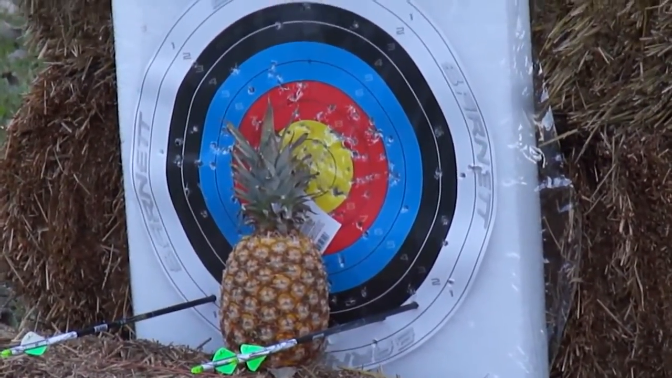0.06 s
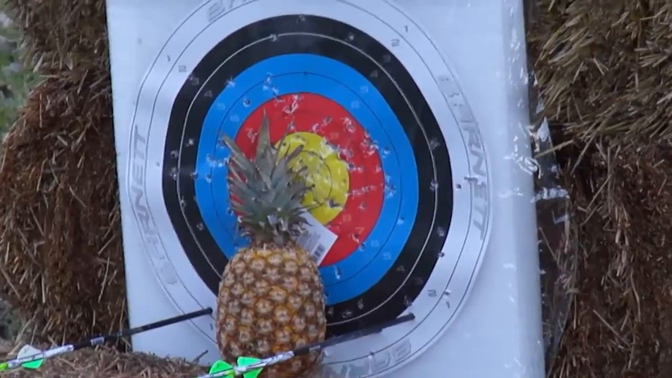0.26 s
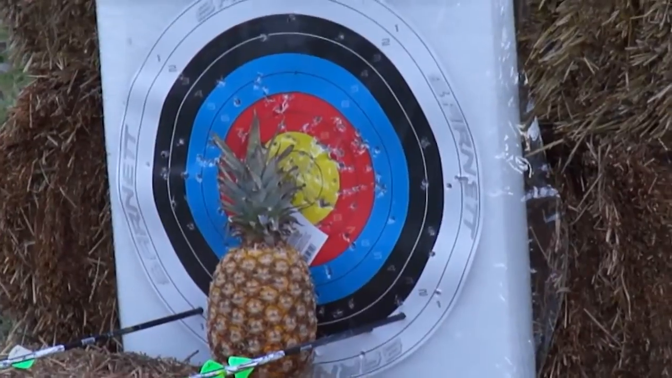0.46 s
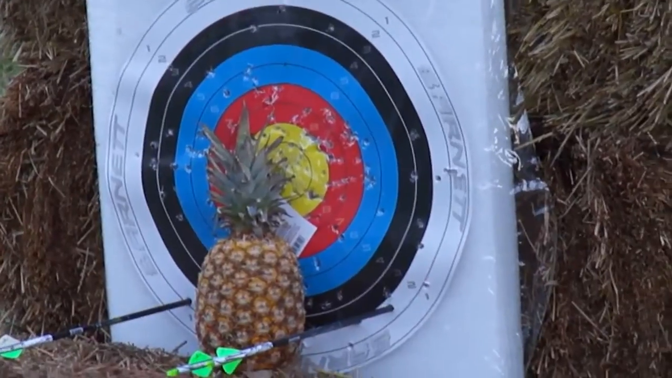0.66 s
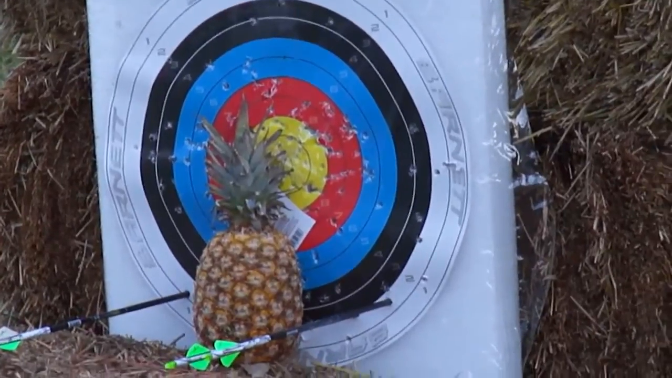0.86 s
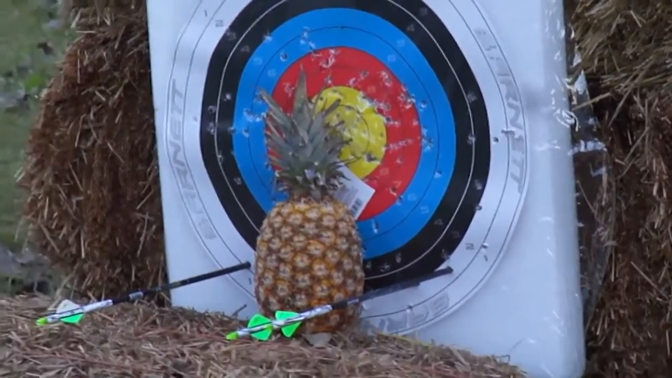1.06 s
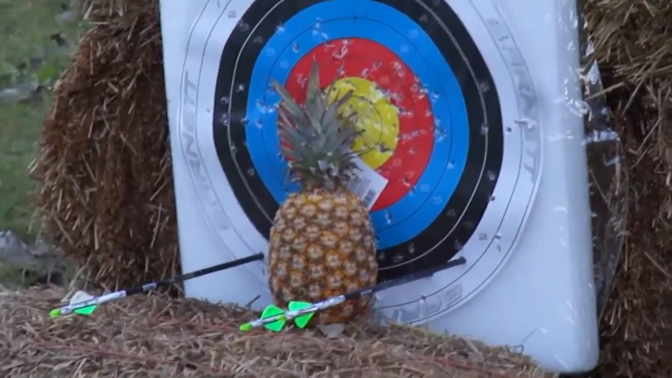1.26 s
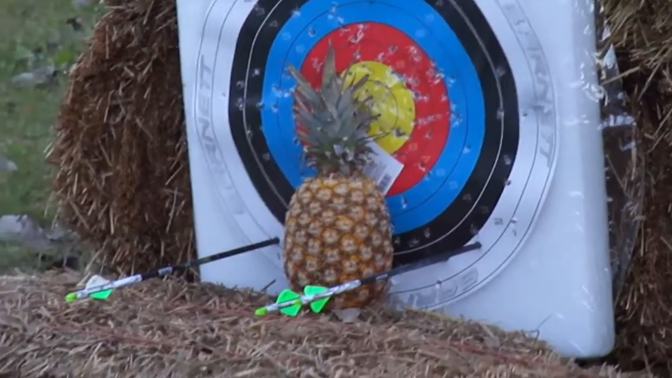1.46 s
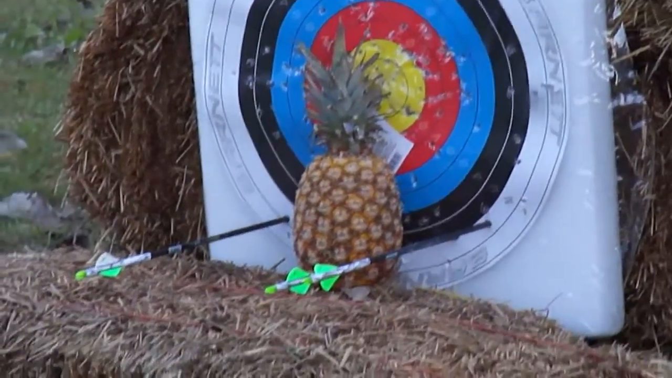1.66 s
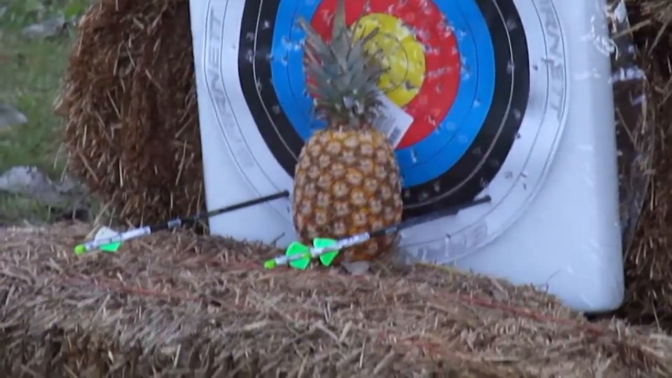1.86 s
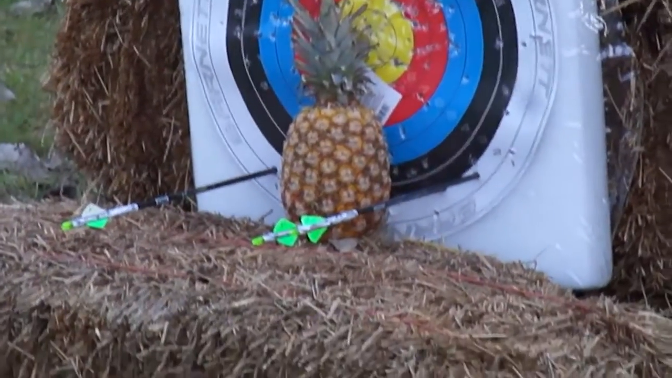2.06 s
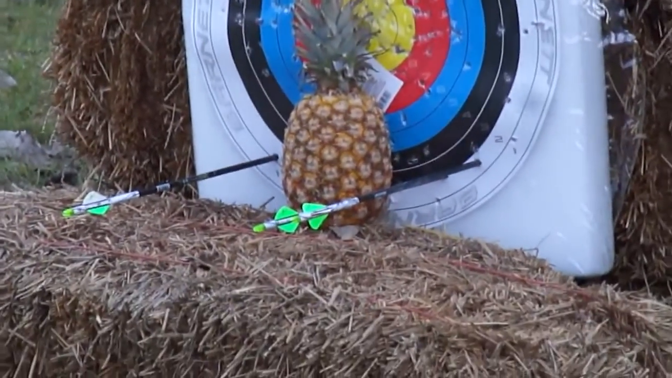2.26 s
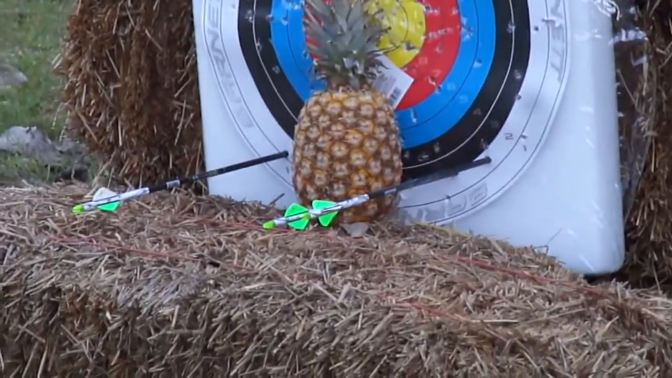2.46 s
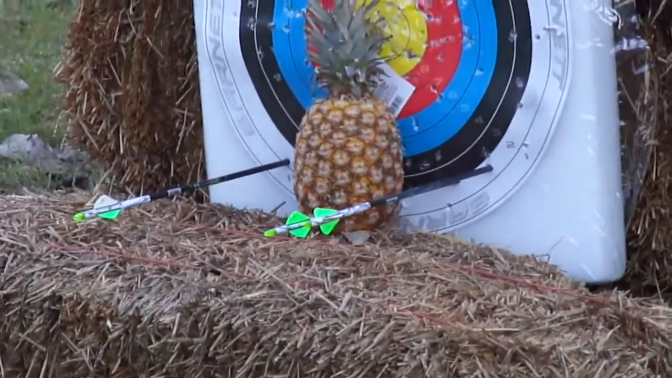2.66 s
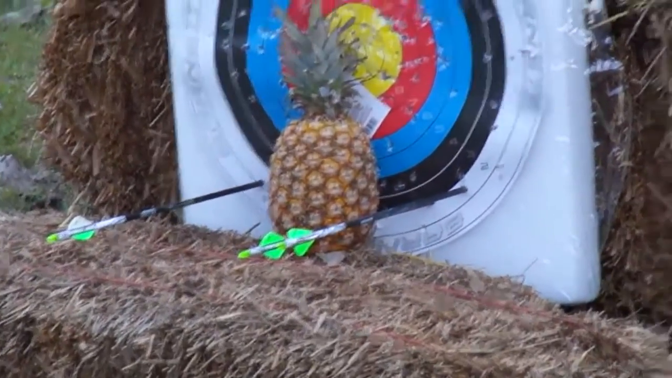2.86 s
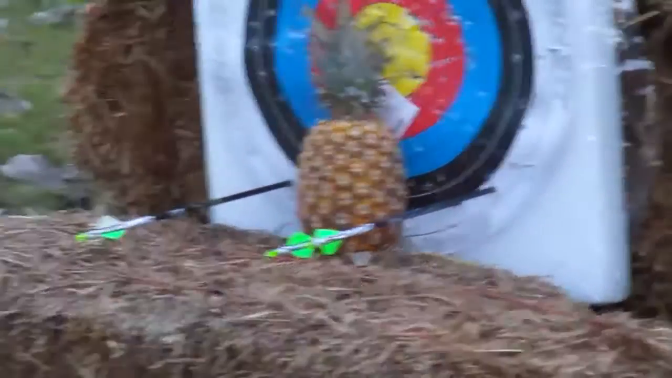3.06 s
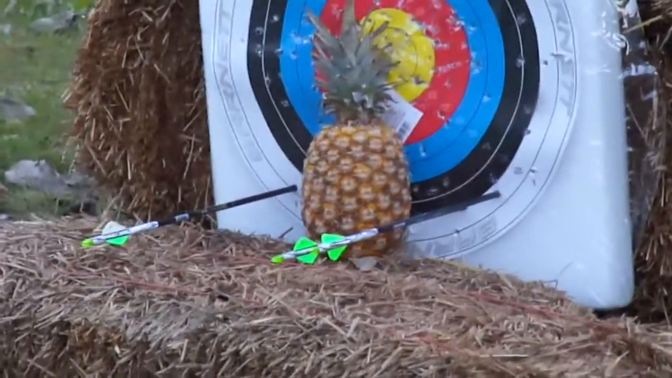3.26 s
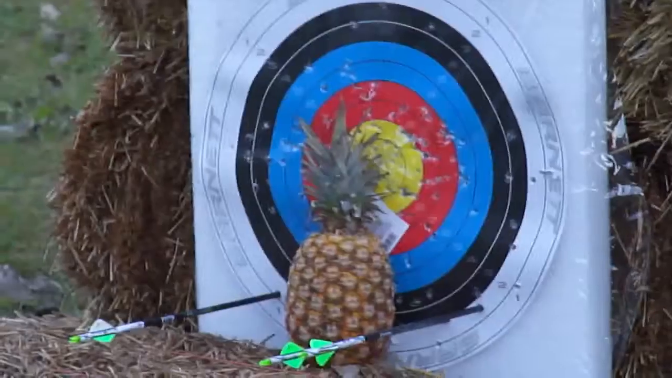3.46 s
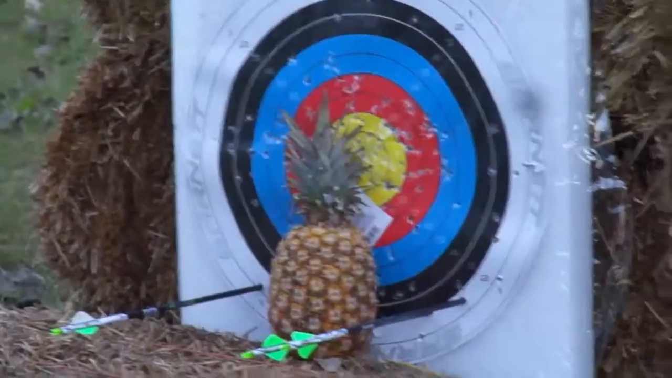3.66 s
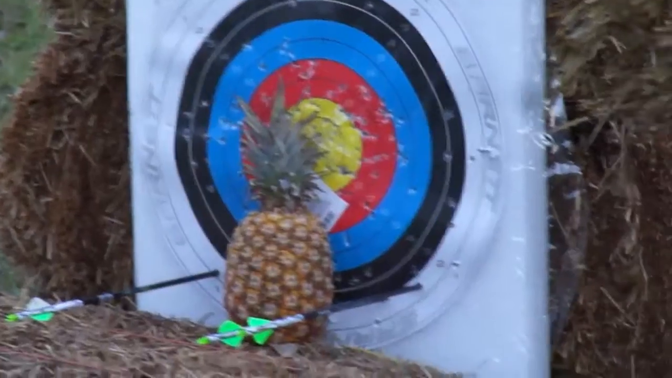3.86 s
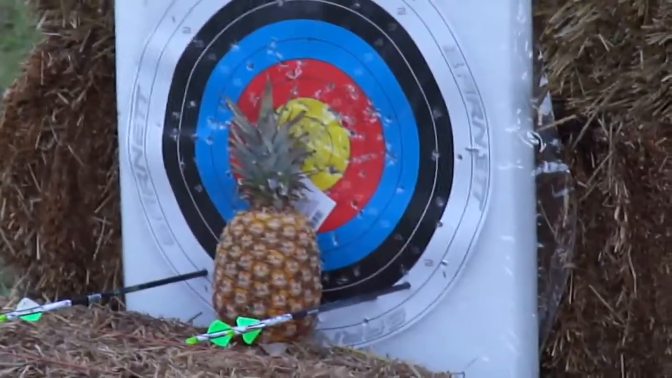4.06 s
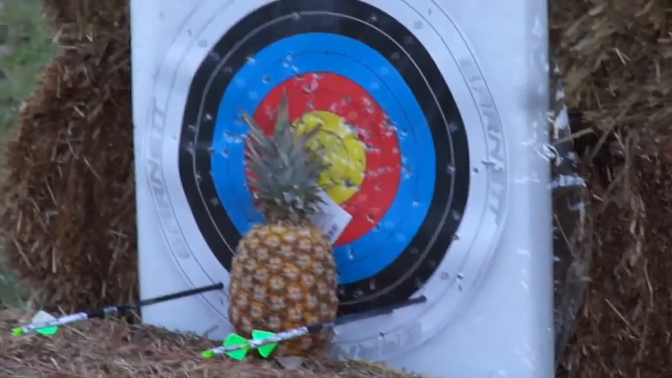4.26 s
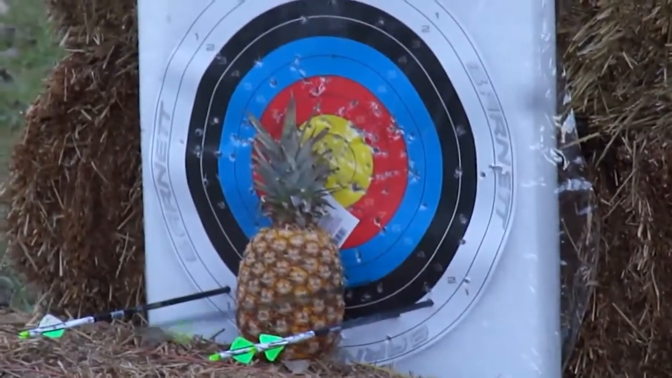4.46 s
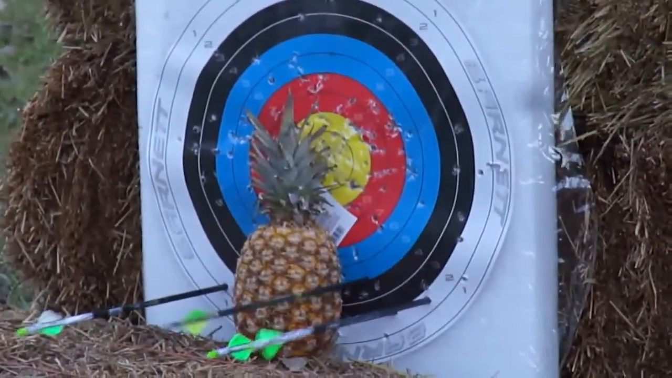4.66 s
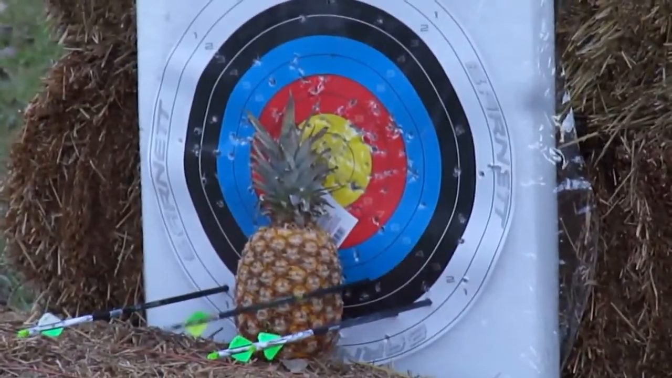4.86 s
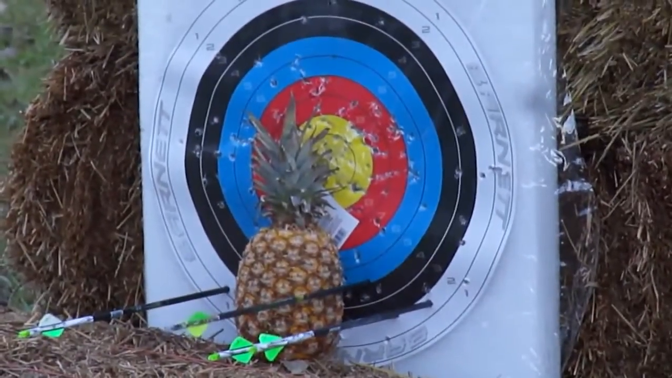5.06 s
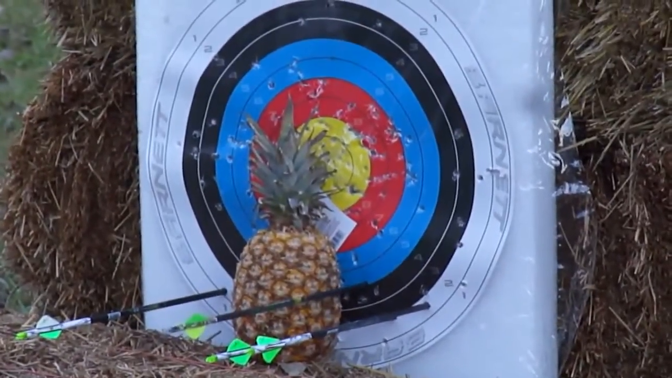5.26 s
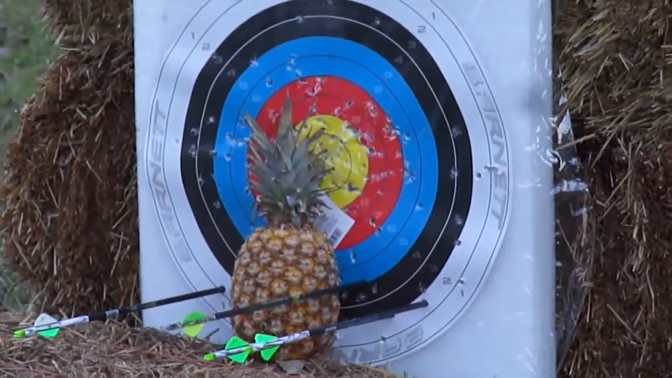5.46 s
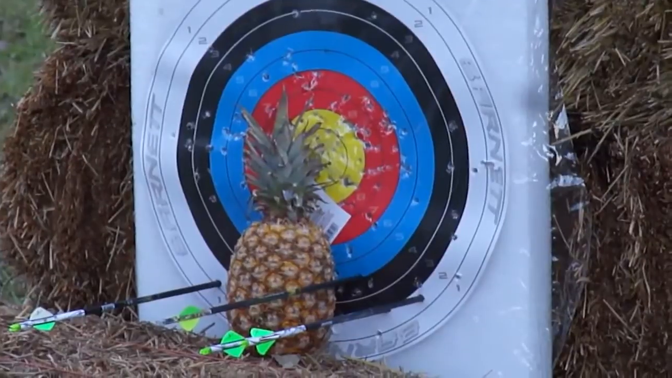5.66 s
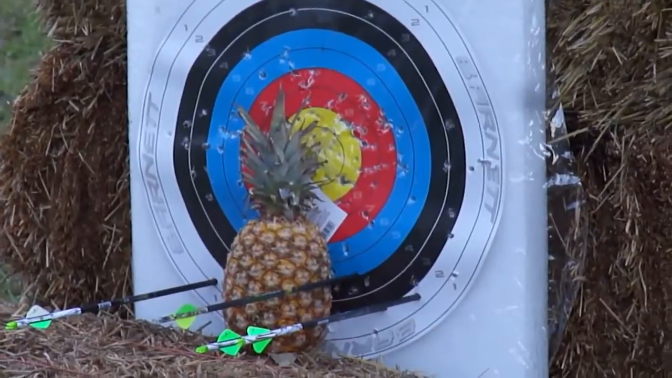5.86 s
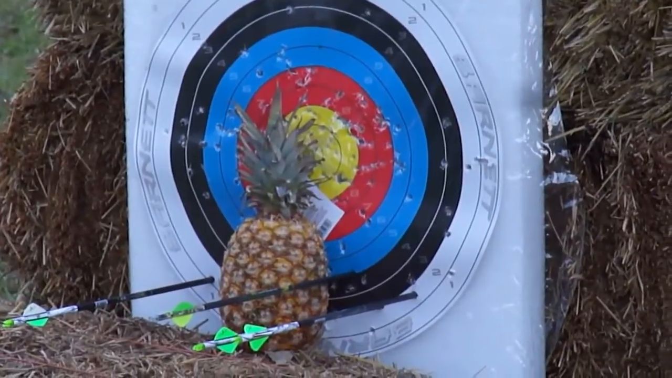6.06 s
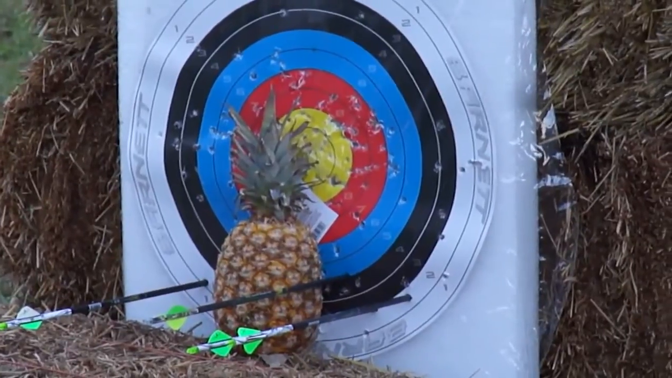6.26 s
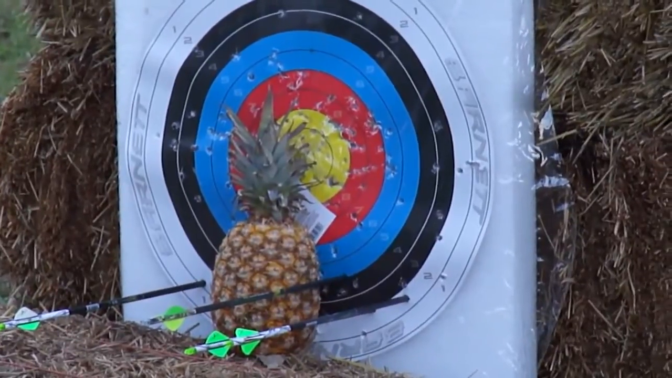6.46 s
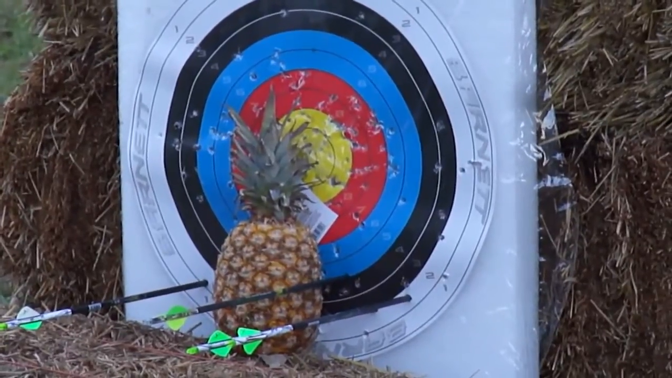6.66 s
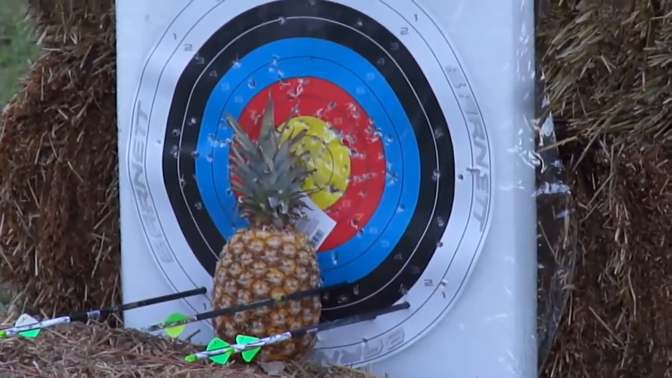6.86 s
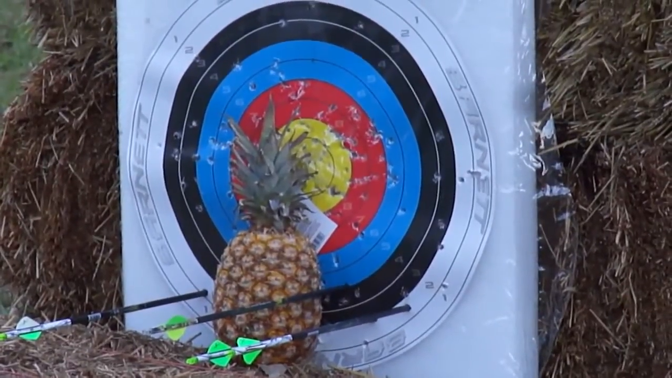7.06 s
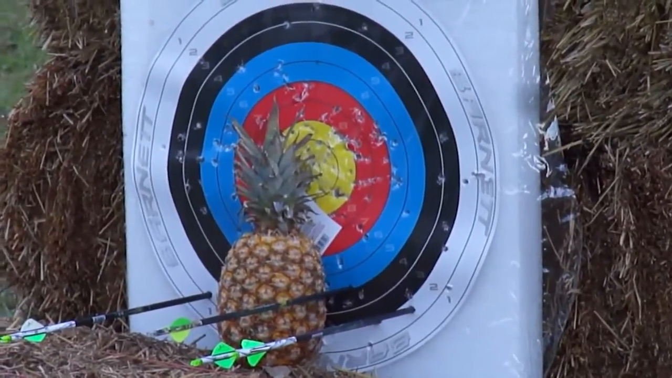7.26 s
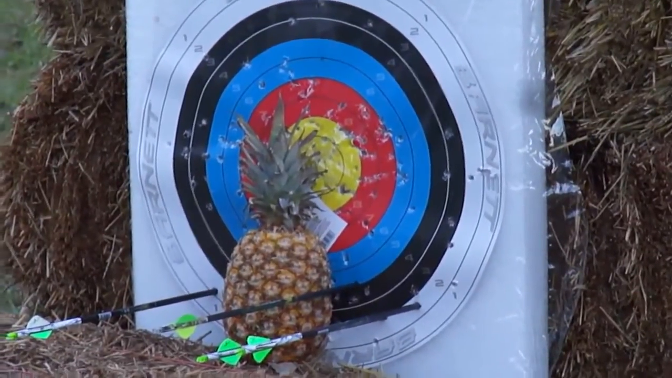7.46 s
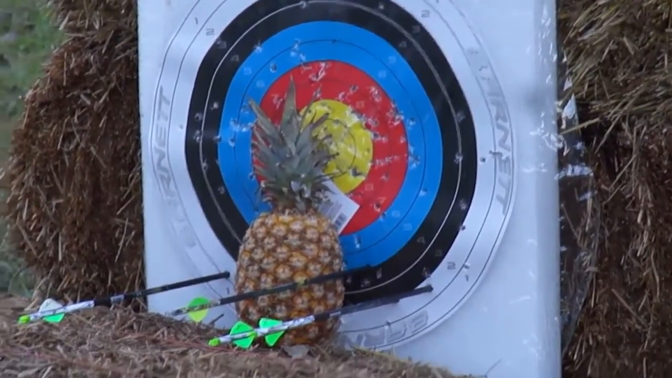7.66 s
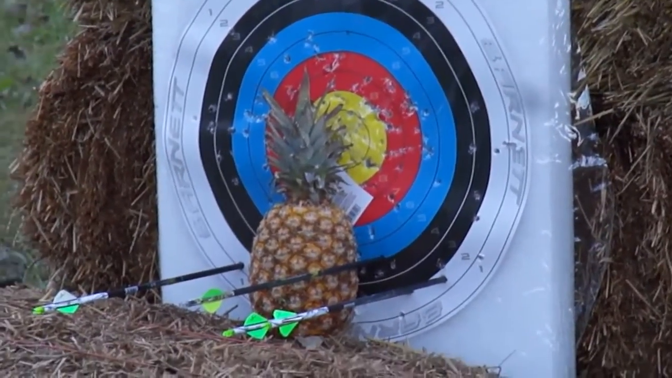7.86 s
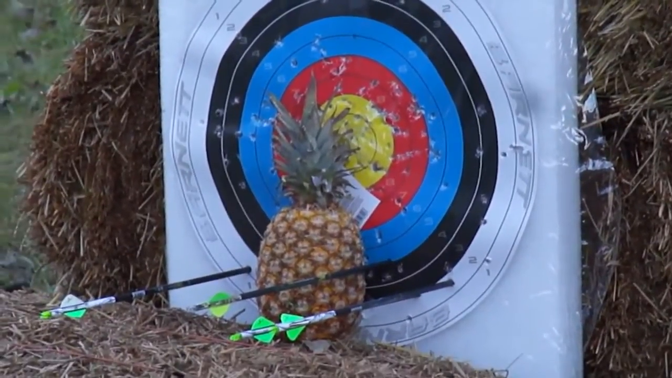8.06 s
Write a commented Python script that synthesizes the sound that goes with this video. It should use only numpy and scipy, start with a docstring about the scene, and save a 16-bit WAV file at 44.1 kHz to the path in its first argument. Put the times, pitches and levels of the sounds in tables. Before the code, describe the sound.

Small, hard clicks sound close by as an arrow is set on a bowstring outdoors, over high cricket trills and a low wash of far traffic. Then come two loud, sharp hits in quick succession: the bow snapping and the arrow striking a foam and straw target, with a short hiss between them. Trees scatter the echo, leaving the insects and a faint, climbing engine hum. The sound cuts out briefly twice before the shot.

```python
"""Crickets trill over far traffic as an archer at the edge of a wood nocks an arrow with light clicks.
The bow cracks twice, as the string is loosed and as it slams to its stop. The vanes hiss, the arrow
smacks into foam and straw a fifth of a second later, and the trees throw shot and hit back.
The sound drops out briefly twice; after the second gap a far engine hums, slowly rising."""
import sys
import numpy as np
from scipy import signal
from scipy.fft import rfft, irfft, next_fast_len
from scipy.io import wavfile

SR = 44100
rng = np.random.default_rng(int(sys.argv[2]) if len(sys.argv) > 2 else 0)


def master_out(mix):
    """Clip the mix to full scale and print it as 16-bit PCM to the path in sys.argv[1]."""
    frames = np.transpose(np.atleast_2d(mix))
    ceiling = np.clip(frames, -1, 1)
    pcm = np.round(ceiling * 32767).astype(np.int16)
    wavfile.write(sys.argv[1], SR, pcm)


N = 358091
HIT_S = 4.5687

# the string is loosed, then slams to its stop: start_s, level_db, crack_db, ring_length_ratio, send_db
BOW_BLOWS = [(4.341, -16.5, -6, 0.24, -13), (4.3429, -14, 6, 0.12, -3.5), (4.3615, -8, 4.5, 0.89, 2)]
# spectrum of a hard crack: frequency_hz, level_db
CRACK_SPECTRUM = [(150, -24), (600, -5), (1000, 9), (1500, 6.5), (3200, 4), (4300, -4), (5400, -3.5),
                  (7000, -2.5), (11000, -15)]
# spectrum of a small click: frequency_hz, level_db
CLICK_SPECTRUM = [(200, -25), (600, -19), (1200, -21), (2000, 1), (3200, 5), (4400, -1.5), (5700, -1),
                  (7500, -12.5), (11000, -20.5)]
# gaps of silence: start_s, end_s
DROPOUTS = [(.940, .9912), (3.418, 3.460)]


def amp(db):
    """Decibels to gain."""
    return 10 ** (np.asarray(db) / 20)


def clock():
    """Time of every sample, in seconds."""
    return np.arange(N) / SR


def colour(x, spectrum):
    """EQ by a curve of (frequency_hz, level_db) points."""
    hz, db = np.transpose(spectrum)
    size = next_fast_len(len(x), True)
    bin_hz = np.maximum(np.arange(size // 2 + 1) * SR / size, 1)
    gain = amp(np.interp(np.log(bin_hz), np.log(hz), db))
    return irfft(rfft(x, size) * gain, size)[:len(x)]


def low_cut(x, hz):
    """Small bodies radiate little bass."""
    return signal.sosfilt(signal.butter(3, hz, "high", fs=SR, output="sos"), x)


def noise(spectrum, size):
    """Coloured noise of rms 1."""
    x = colour(rng.standard_normal(size), spectrum)
    return x / np.sqrt(np.mean(x ** 2))


def drift(t, rate):
    """Glide through rate random values a second."""
    return np.interp((t - t[0]) * rate, np.arange(4096), rng.standard_normal(4096))


def fade(t, t60):
    """Exponential decay, 60 dB in t60 seconds."""
    return np.exp(-np.log(1000) * t / t60)


def hold(t, until, t60):
    """Full level up to a time, then an exponential decay."""
    return fade(np.maximum(t - until, 0), t60)


def gate(t, start, end, edge):
    """Window with ramps edge seconds long."""
    return np.clip((t - start) / edge + .5, 0, 1) * np.clip((end - t) / edge + .5, 0, 1)


def ring(t, modes, length=1):
    """Damped modes struck at t = 0; length scales their decay times."""
    return sum(amp(db) * fade(t, t60 * length) * np.sin(2 * np.pi * hz * t) for hz, db, t60 in modes)


def snap(start_s, db, spectrum):
    """One sharp, coloured pressure pulse."""
    pulse = np.zeros(N)
    pulse[int(start_s * SR)] = amp(db)
    return colour(pulse, spectrum)


def add(out, start_s, x):
    """Mix x in at start_s."""
    i = max(int(start_s * SR), 0)
    out[i:i + len(x)] += x[:max(N - i, 0)]


def far_traffic():
    """A bed of far traffic and insects, with wavering drones."""
    # the bed before and after the second gap: frequency_hz, level_db
    early_spectrum = [(30, -24), (70, -15), (146, -1), (250, -7.5), (500, -4.5), (650, -0.5), (930, -4.5),
                      (1600, -9.5), (2700, -16.5), (3250, -16), (3720, -7.5), (4300, -17), (6000, -21.5),
                      (11000, -26.5)]
    late_spectrum = [(30, -24), (75, -9), (120, -0.5), (210, -4.5), (300, -4), (480, -5.5), (760, -1),
                     (1100, -5), (1700, -10), (2900, -17.5), (3700, -12), (4400, -17.5), (6000, -22.5),
                     (11000, -27)]
    # far drones: start_s, end_s, pitch_hz, level_db
    drones = [(0, .94, 192, -61), (2.444, 8.15, 191.6, -59.5), (3.44, 8.15, 230.2, -60.5),
              (4.7, 8.15, 835, -66)]
    t = clock()
    late = amp(-47.5) * noise(late_spectrum, N)
    early = amp(-48.5) * noise(early_spectrum, N)
    bed = np.where(t > np.mean(DROPOUTS[1]), late, early)
    bed *= amp(0.37 * drift(t, 2.74) + .5 * drift(t, 18))
    for start, end, hz, db in drones:
        phase = 2 * np.pi * hz * t
        drone = drift(t, 9) * np.sin(phase) + drift(t, 9) * np.cos(phase)
        bed += amp(db) * gate(t, start, end, .1) * drone
    return bed


def engine():
    """From the second gap on, a far engine gathers speed: its firing note climbs and swells."""
    start_hz, rise_hz_per_s, swell_db_per_hz = 63, 2.7, 1.31
    t = clock() - np.mean(DROPOUTS[1])
    gained_hz = rise_hz_per_s * t
    phase = 2 * np.pi * np.cumsum(start_hz + gained_hz) / SR
    level_db = -75.5 + swell_db_per_hz * gained_hz + 2.3 * drift(t, 7.5)
    return (t > 0) * np.sqrt(2) * amp(level_db) * np.sin(phase)


def bird_chips():
    """Faint high chips, as of a small bird, smeared by distance into narrow puffs."""
    # notes: peak_s, level_db
    notes = [(1.925, -61), (2.04, -59), (2.15, -60), (2.44, -59), (2.525, -58), (2.635, -60), (5.955, -55)]
    pitch_hz, half_length_s = 5600, 0.012
    t = clock()
    envelope = sum(amp(db) * np.exp(-np.minimum(((t - s) / half_length_s) ** 2, 20)) for s, db in notes)
    return envelope * noise([(pitch_hz * 0.51, -30), (pitch_hz, 0), (pitch_hz * 1.7, -24)], N)


def wings(t, hz, strokes_per_s, sweep, blur_hz, uneven_db):
    """Each wing stroke is a tone falling by about 1.2 * sweep Hz; grass and distance blur it."""
    stroke = (np.cumsum(strokes_per_s * np.ones(len(t))) / SR + .05 * drift(t, 15)) % 1
    pitch_hz = hz + sweep * (np.exp(2 * (.5 - stroke)) - 1) / 2 + blur_hz * drift(t, 160)
    # a wide sweep is a short, distinct stroke; far insects run together
    envelope = np.sin(np.pi * stroke) ** (0.44 + abs(sweep) / 150)
    envelope *= amp(uneven_db * drift(t, 45))
    return envelope * np.sin(2 * np.pi * np.cumsum(pitch_hz) / SR)


def crickets():
    """Rubbing wings: one near trill, a lower, blurred chorus far off, and short chirps in turn."""
    # the nearest cricket: time_s, strokes_per_s, level_db
    trill = [(0, 30, -52), (.9, 29, -52), (1.1, 31, -62), (3.3, 31, -64), (3.5, 32, -50.5), (6.2, 36, -53),
             (6.7, 40, -52.5), (7.5, 44, -49), (8.1, 47, -46)]
    # swells of the chorus: time_s, level_db
    chorus = [(0, -65), (1.5, -63), (1.9, -55), (2.3, -61), (2.8, -51.5), (3.4, -63), (4.1, -53),
              (5.2, -68), (5.9, -57), (6.9, -56), (8.1, -68)]
    # single chirps: start_s, pitch_hz, level_db
    chirps = [(.07, 4460, -57.5), (1.0, 4470, -62), (1.55, 4020, -58.5), (1.75, 3760, -53.5),
              (2.15, 4060, -53.5), (3.351, 4030, -54.5), (4.55, 4010, -54.5), (5.62, 3770, -55),
              (5.8, 4040, -54), (6.69, 4460, -59.5), (7.04, 3750, -55.5), (7.87, 4040, -50.5)]
    chirp_s, lead_s = 0.43, .04
    t = clock()
    times, rates, levels = np.transpose(trill)
    near = wings(t, 4174, np.interp(t, times, rates), sweep=1500, blur_hz=80, uneven_db=2)
    far = wings(t, 3640, strokes_per_s=51, sweep=100, blur_hz=54.2, uneven_db=2.5)
    out = amp(np.interp(t, times, levels)) * near
    out += amp(np.interp(t, *np.transpose(chorus))) * far
    t = t[:SR * 3 // 4]
    for start, hz, db in chirps:
        chirp = wings(t, hz, strokes_per_s=40, sweep=70, blur_hz=27, uneven_db=2.8)
        add(out, start - lead_s, amp(db) * gate(t, lead_s, lead_s + chirp_s, .08) * chirp)
    return out


def faint_ring():
    """Two tones fade in a soft wash as the sound returns from the first gap."""
    out, t = np.zeros(N), clock()[:SR]
    wash = noise([(900, -28), (1900, 7), (2400, 4), (3200, -16), (9000, -35)], len(t))
    tones = ring(t, [(1800, -35.5, 0.13), (2200, -51, 0.44)])
    add(out, start_s=0.99, x=tones + amp(-47.5) * wash * fade(t, 0.92))
    return out


def knock():
    """A dull, narrow knock from far off, with a soft attack."""
    start_s, hz = 6.165, 1140
    out, t = np.zeros(N), clock()[:SR // 3]
    body = noise([(hz / 2, -22), (hz, 0), (hz * 2, -26), (hz * 4, -50)], len(t))
    add(out, start_s, amp(-33.5) * body * fade(t, 0.086) * (1 - fade(t, 0.023)))
    return out


def tree_echo(send, near_db, far_db):
    """Scattered returns from trunks and leaves, one near reflection and one dull, far one."""
    first_return_s, near_s, far_s = .031, .0295, .405
    t = clock()[:SR * 3 // 2]
    flicker = amp(2.5 * drift(t, 400))
    # near trunks answer first and loudest, the deeper wood softer and longer
    trunks = hold(t, until=0.11, t60=0.18)
    deep_wood = amp(-15.5) * hold(t, until=0.48, t60=0.94)
    scatter = rng.standard_normal(len(t)) * flicker * np.hypot(trunks, deep_wood) * (t > first_return_s)
    scatter /= np.linalg.norm(scatter)
    # air takes the treble on long paths, soft ground takes the bass
    treble = colour(scatter, [(2000, -31), (3200, -1.5), (4200, -5), (6500, 2.5)])
    bass = colour(scatter, [(450, 2), (900, 3.0), (1800, -32)])
    echo = scatter - treble * (1 - fade(t, 2.27)) - bass * (1 - fade(t, 0.94))
    near, far = np.zeros((2, len(t)))
    near[int(near_s * SR)], far[int(far_s * SR)] = amp(near_db), amp(far_db)
    echo += colour(near, [(400, -20), (850, -27), (1400, -19), (2400, 7), (3300, -17), (5000, -22),
                          (7000, -6), (11000, -10)])
    echo += colour(far, [(350, -28), (850, 1.0), (1400, 7), (2500, -8), (8000, -22)])
    return signal.fftconvolve(send, echo)[:N]


def rustle():
    """Fingers and sleeve give sparse tiny ticks, each its own short burst."""
    # movements: start_s, end_s, ticks_per_s, level_db, brightest_hz
    movements = [(.05, .45, 50, -44, 3160), (2.8, 2.98, 70, -36, 2100), (3.08, 3.18, 50, -50, 4500),
                 (7.75, 7.899, 50, -48, 5000)]
    out, t = np.zeros(N), clock()
    tick_decay = fade(t[:SR // 20], t60=0.01)
    for start, end, rate, db, hz in movements:
        ticks = gate(t, start, end, .05) * (rng.random(N) < rate / SR) * rng.random(N)
        grain = noise([(f * hz / 3200, level) for f, level in CLICK_SPECTRUM], N)
        out += amp(db) * grain * signal.fftconvolve(ticks, tick_decay)[:N]
    return out


def nocking():
    """Small hard parts snap together: a sharp edge, a short ping, a dry crack and the shaft's ring."""
    # nock, rest and arrow: start_s, level_db, pitch_hz, shaft_db
    clicks = [(.0565, -37.5, 2600, -10), (.179, -37, 2450, -4), (0.21, -36.5, 2300, -6),
              (.3532, -33, 2980, -3), (0.412, -31.5, 3150, -1), (0.5723, -38.5, 2400, -10),
              (.6536, -16.5, 1790, -2), (.688, -15.5, 3170, -8), (2.8556, -9, 3055, -5),
              (3.079, -18, 2720, 8), (3.1723, -24, 3440, -6), (3.595, -21, 1780, -11),
              (3.5966, -27.5, 2600, -20), (4.482, -13, 9000, -20), (7.005, -37, 5670, -10),
              (7.464, -40, 3010, -8)]
    # the arrow on the string: pitch_hz, level_db, t60_s
    shaft_modes = [(700, -34, 0.013), (873, -16.5, 0.048), (1234, -24, 0.029), (1804, -16.5, 0.035),
                   (2500, -19.5, 0.027), (3550, -33, 0.015), (5950, -23, 0.018)]
    ping_cycles, crack_db, edge_db = 18.7, -2, 4.5
    out, t = np.zeros(N), clock()[:SR // 10]
    for start, db, hz, shaft_db in clicks:
        t60 = ping_cycles / hz  # high clicks are shorter
        ping = ring(t, [(hz, 0, t60)])
        crack = amp(crack_db) * noise(CLICK_SPECTRUM, len(t)) * fade(t, 1.32 * t60)
        shaft = amp(shaft_db) * ring(t, shaft_modes)
        add(out, start, amp(db) * (ping + crack + shaft))
        out += snap(start, db + edge_db, CRACK_SPECTRUM)
    return low_cut(out, hz=378)


def flight():
    """The string swishes to its stop and pushes the air; the vanes hiss and flutter until the hit."""
    # air rushing past string and vanes: frequency_hz, level_db
    hiss_spectrum = [(200, -30), (700, -1.5), (1500, -1.5), (2700, 5), (3400, 5.5), (4200, -0.5),
                     (6000, -4), (11000, -14)]
    # the push of air: pitch_hz, level_db, t60_s
    thump = [(95, -42, .04)]
    rise_db_per_s, flutter_db = 1000, 2.5
    t, stop_s = clock(), BOW_BLOWS[-1][0]
    swish = amp(-27 - rise_db_per_s * np.maximum(stop_s - t, 0)) * hold(t, stop_s, t60=.1)
    vanes = amp(-35) * gate(t, stop_s, HIT_S, .006)
    out = noise(hiss_spectrum, N) * np.hypot(swish, vanes) * amp(flutter_db * drift(t, 260))
    add(out, stop_s, ring(t[:SR // 5], thump))
    return out


def target():
    """The point smacks in and the foam block thuds; gives the close sound and the echo send."""
    # point, fruit and foam: pitch_hz, level_db, t60_s
    target_modes = [(239, -38, 0.11), (299, -32.5, 0.15), (893, -52, .02), (1230, -42, .013),
                    (1770, -33, 0.0042), (2240, 2, 0.0089), (2520, 4.5, 0.0087)]
    # the hit as it reaches the trees: frequency_hz, level_db
    send_spectrum = [(250, -13), (900, -17), (1400, -7.5), (1900, -1), (2600, 2), (3300, -12), (4500, -25),
                     (7000, -18), (11000, -29)]
    close, t = np.zeros(N), clock()[:SR // 3]
    crack = noise(CRACK_SPECTRUM, len(t)) * (amp(-4.5) * fade(t, 0.0096) + amp(-33) * fade(t, 0.042))
    add(close, HIT_S, amp(-7.5) * (ring(t, target_modes) + crack))
    return low_cut(close, hz=209), snap(HIT_S, 10.7, send_spectrum)


def bow():
    """Each blow of the string cracks and rings the limbs; gives the close sound and the echo send."""
    # limbs, riser and string: pitch_hz, level_db, t60_s (scaled by each blow)
    bow_modes = [(405, -12, 0.13), (500, -14, 0.051), (814, -19, 0.079), (854, -10, .11),
                 (955, -2.5, 0.022), (1390, -16, 0.026), (2010, -4, 0.0092), (2460, -1.5, 0.0081),
                 (3500, -15, .022)]
    # the shot as it reaches the trees: frequency_hz, level_db
    send_spectrum = [(250, -27), (440, 0.5), (600, -10), (900, 3.5), (1300, -1), (2000, -10.5), (2700, 1),
                     (3350, 5.5), (4300, -2), (5400, -3), (7500, -4), (11000, -13)]
    close, send, t = np.zeros(N), np.zeros(N), clock()[:SR // 3]
    crack_decay = amp(-2.5) * fade(t, 0.012) + amp(-25.5) * fade(t, 0.13)
    for start, db, crack_db, length, send_db in BOW_BLOWS:
        limbs = ring(t, bow_modes, length)
        crack = noise(CRACK_SPECTRUM, len(t)) * crack_decay
        add(close, start, amp(db) * (limbs + amp(crack_db) * crack))
        # downrange each blow is one bright snap over the ring of the limbs
        send += snap(start, db + send_db + 22.5, send_spectrum)
        add(send, start, amp(db + send_db - 4.0) * colour(limbs, send_spectrum))
    return low_cut(close, hz=358), low_cut(send, hz=350)


def scene():
    """Mono mix; only the shot and the hit are loud enough to wake the wood."""
    shot, shot_send = bow()
    hit, hit_send = target()
    shot_echo = amp(2.0) * tree_echo(shot_send, near_db=-4.5, far_db=-22.5)
    hit_echo = tree_echo(hit_send, near_db=-20, far_db=-29)
    archery = nocking() + rustle() + shot + flight() + hit + shot_echo + hit_echo
    return (archery + knock() + bird_chips() + crickets() + far_traffic() + engine() + faint_ring())[None]


def record(dry):
    """The loudest peaks are rounded, the sound drops out twice and the top is cut."""
    ceiling, top_hz = 0.79, 11000
    t = clock()
    wet = ceiling * np.tanh(dry / ceiling)
    for start, end in DROPOUTS:
        wet *= 1 - gate(t, start, end, .001)
    return signal.sosfilt(signal.ellip(10, .2, 70, top_hz, fs=SR, output="sos"), wet)


dry = scene()
out = record(dry)
master_out(out)
```